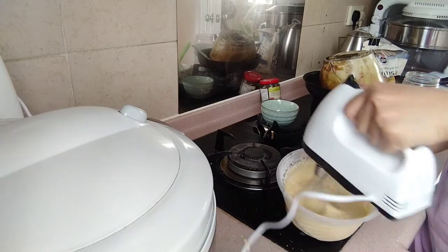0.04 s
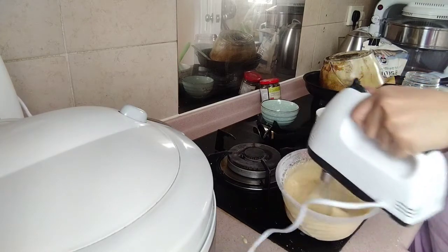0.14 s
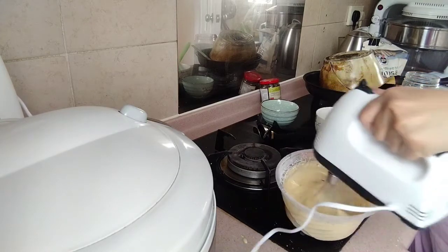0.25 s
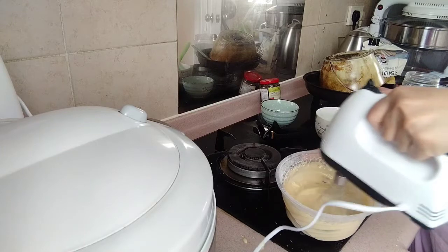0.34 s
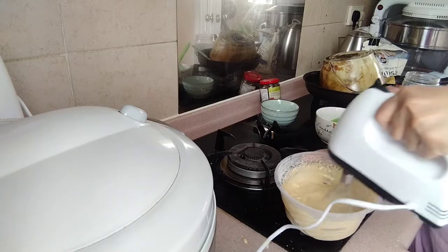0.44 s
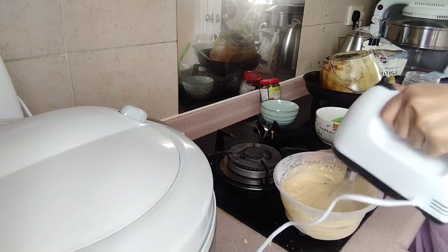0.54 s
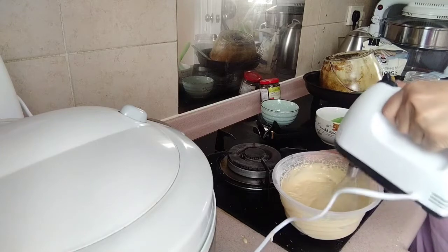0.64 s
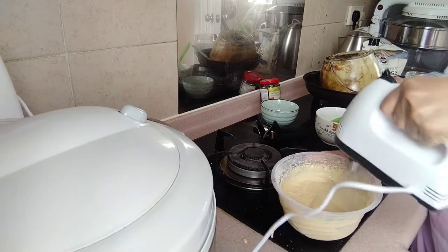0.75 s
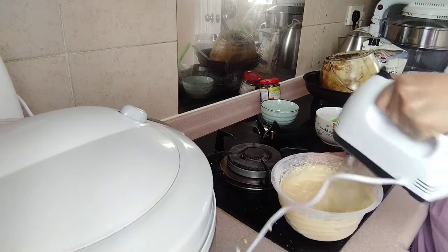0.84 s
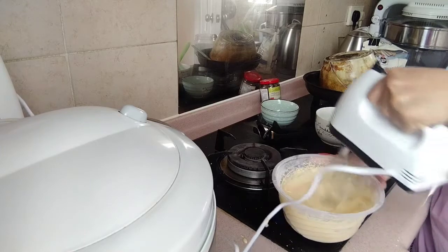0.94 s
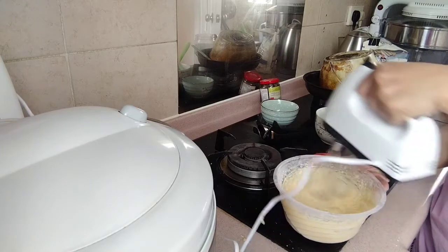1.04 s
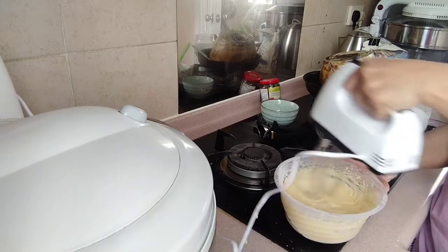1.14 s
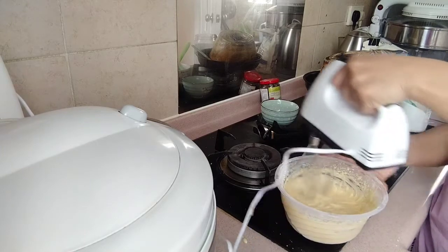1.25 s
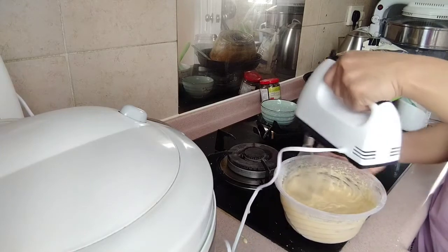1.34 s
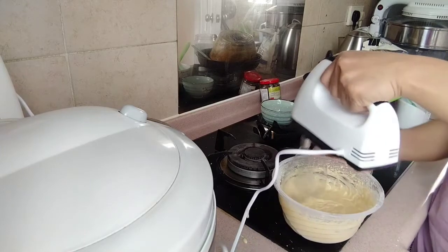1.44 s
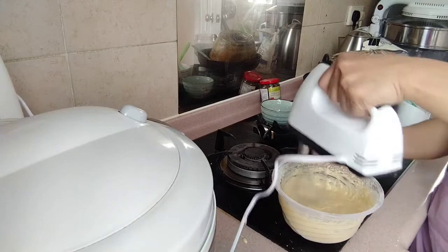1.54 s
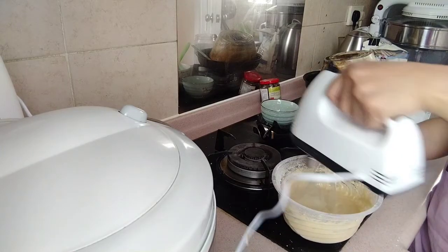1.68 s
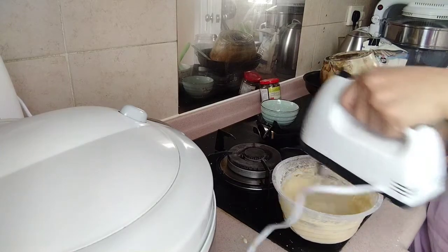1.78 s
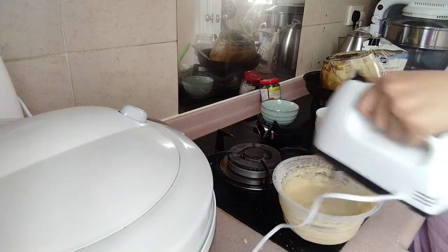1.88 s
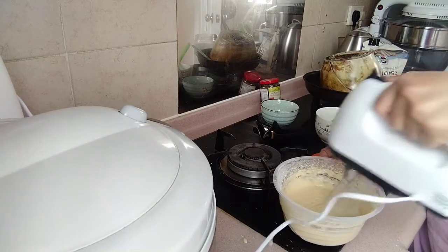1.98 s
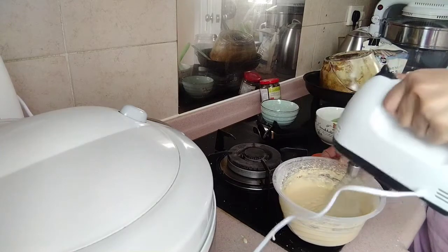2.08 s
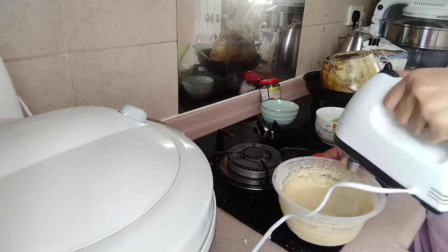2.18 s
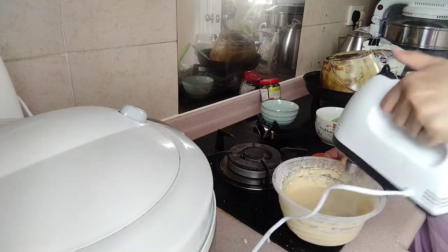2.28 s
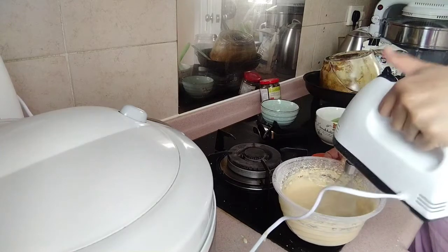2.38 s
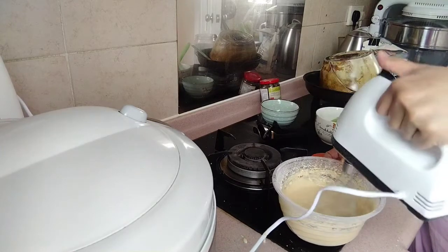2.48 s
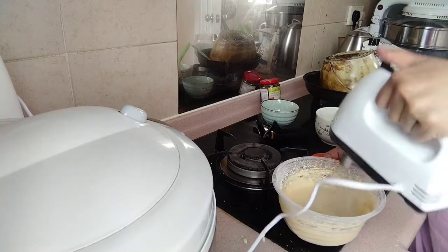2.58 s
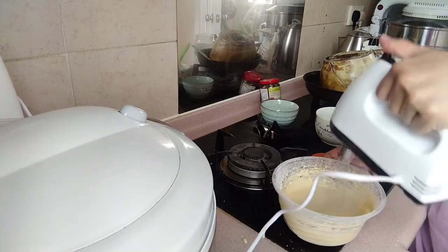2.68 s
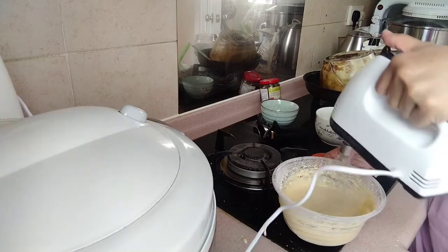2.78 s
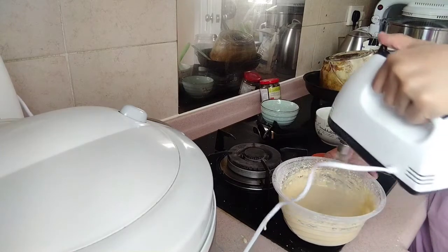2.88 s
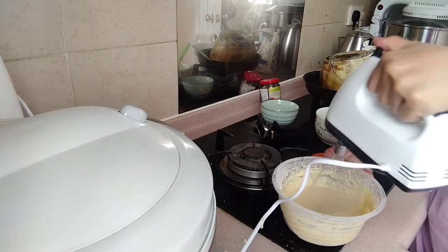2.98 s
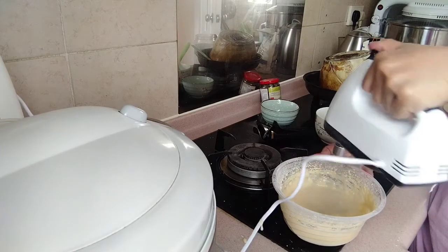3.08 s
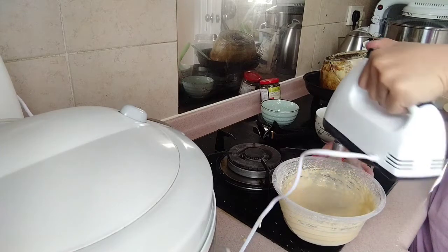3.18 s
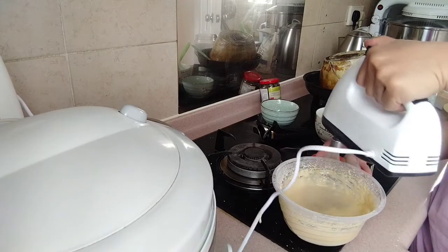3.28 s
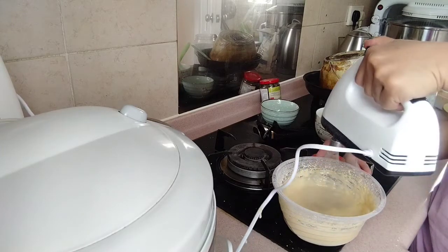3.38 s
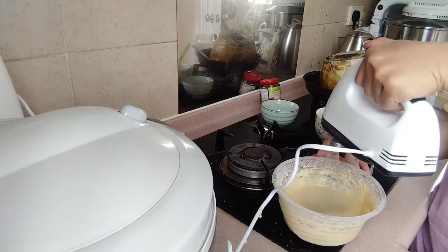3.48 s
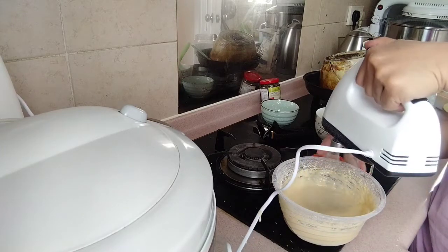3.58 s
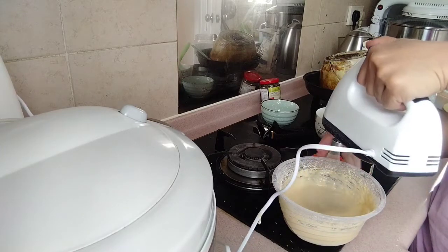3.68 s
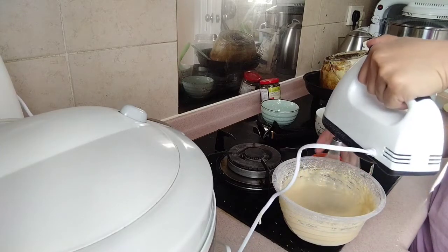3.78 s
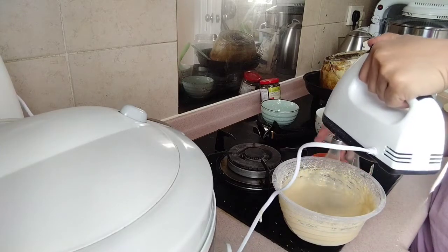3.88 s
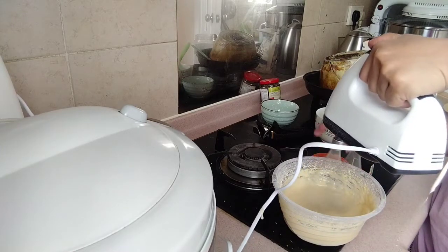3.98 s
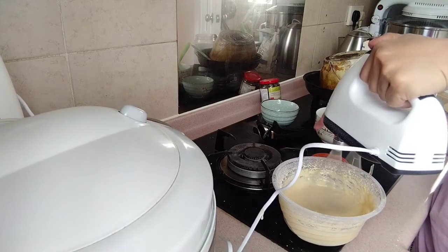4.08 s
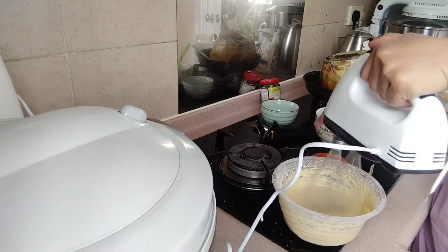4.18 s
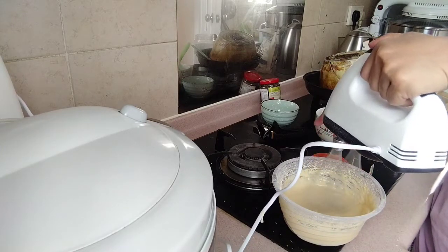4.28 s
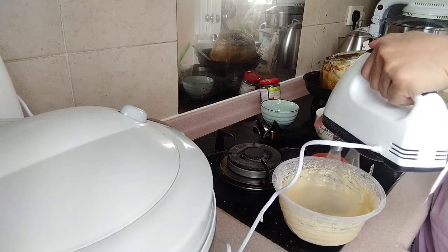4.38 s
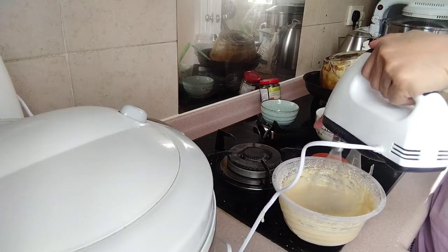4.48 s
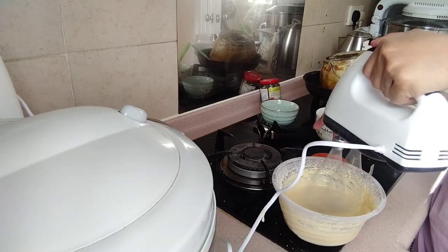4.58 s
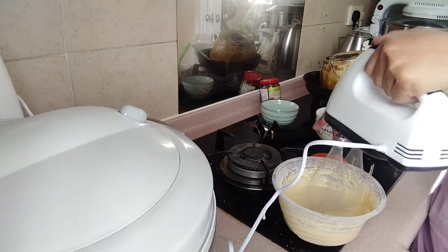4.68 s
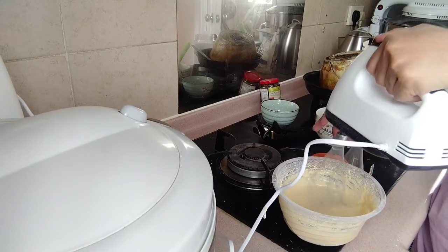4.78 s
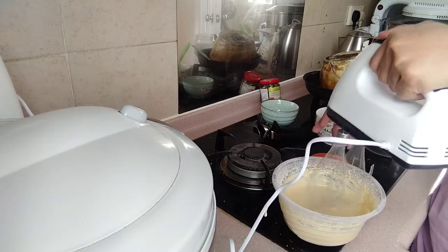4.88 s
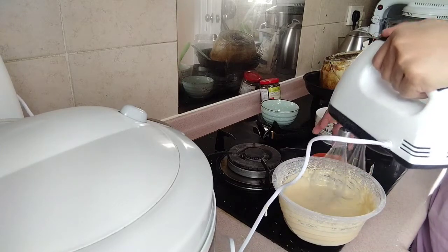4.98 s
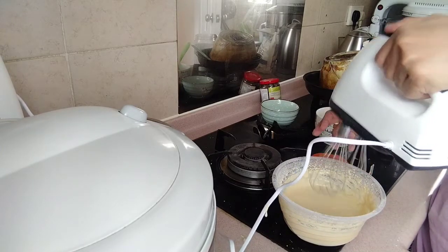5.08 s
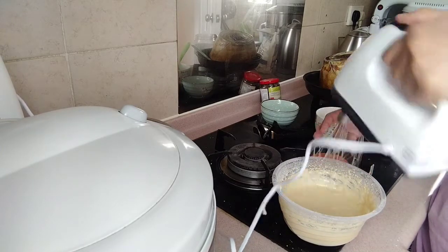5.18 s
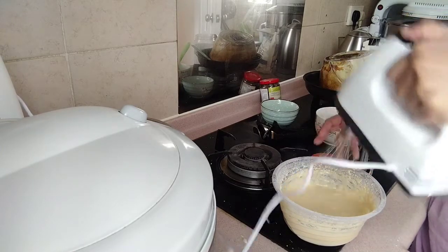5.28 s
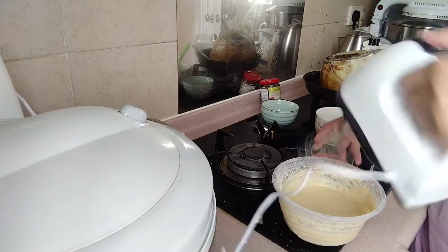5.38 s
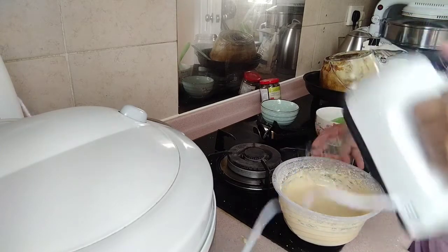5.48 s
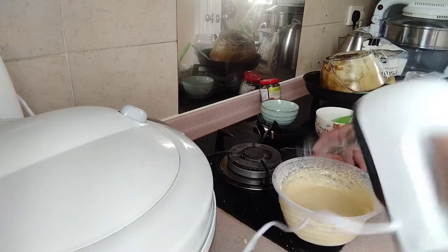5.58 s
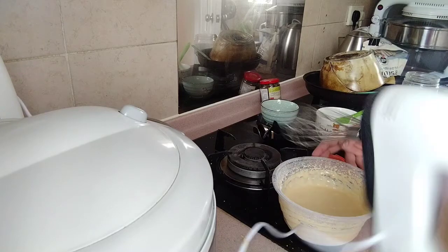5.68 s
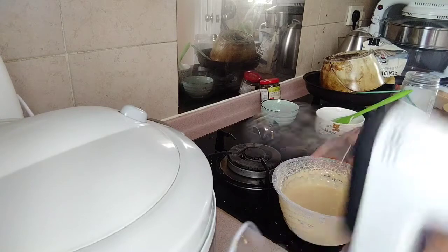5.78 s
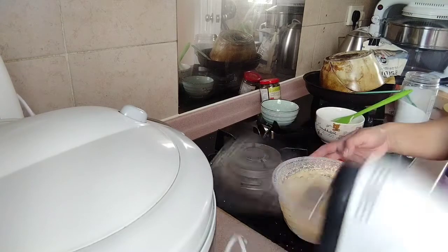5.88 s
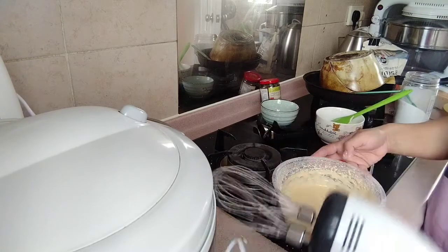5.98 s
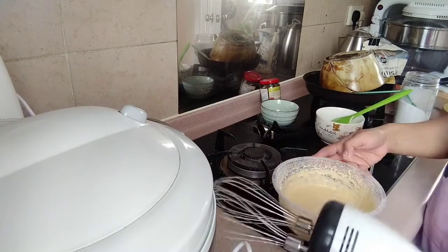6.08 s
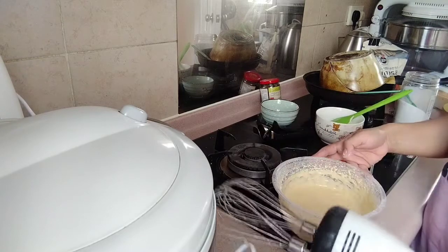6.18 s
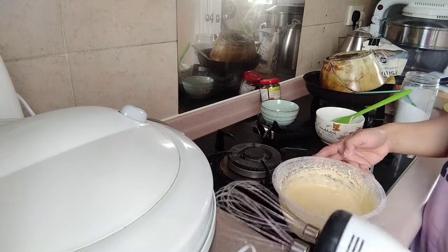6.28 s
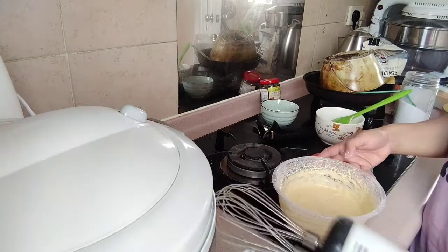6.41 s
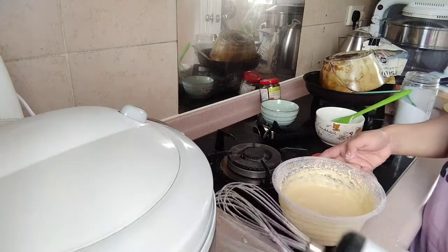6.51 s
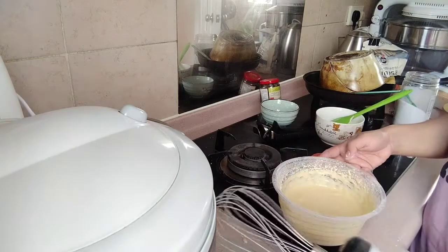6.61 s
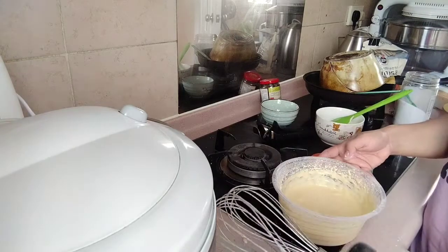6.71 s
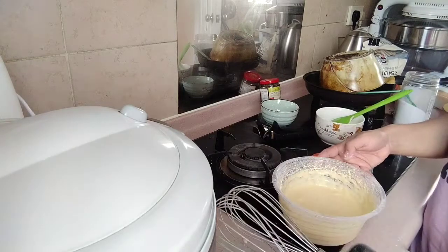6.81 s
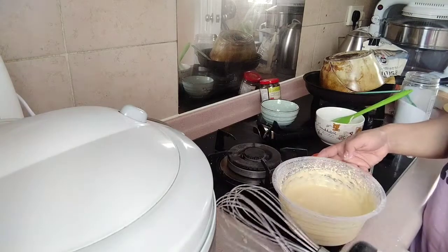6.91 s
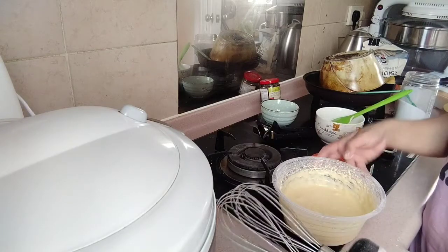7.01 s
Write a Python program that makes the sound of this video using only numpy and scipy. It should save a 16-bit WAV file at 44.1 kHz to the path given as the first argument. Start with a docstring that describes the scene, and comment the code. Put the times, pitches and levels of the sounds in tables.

```python
"""An electric hand mixer whisks batter in a plastic bowl in a small tiled kitchen with a low room murmur.
At first, on the slow setting, the rotor hums, the commutator whines, gears and wire beaters rattle and the
motor sags under load; the beaters dip, graze and strike the bowl while batter slaps and gulps. It speeds up to
the fast setting, is switched off and coasts to rest. Laid on the counter, it knocks, scrapes, clinks and twangs.
Shaft-driven tones, clicks and noise make the running motor; struck modes and noise bursts make the contacts."""
import sys
import numpy as np
from scipy import signal
from scipy.fft import rfft, irfft, next_fast_len
from scipy.io import wavfile
from scipy.ndimage import uniform_filter1d

SR = 44100
rng = np.random.default_rng(int(sys.argv[2]) if len(sys.argv) > 2 else 0)


def inscribe(sig):
    """Save sig as 16-bit PCM at rate SR to the path in sys.argv[1].

    A 1-D sig is mono; a 2-D sig holds one channel per row.
    Samples are clipped to [-1, 1] before scaling.
    """
    pcm = np.round(np.clip(np.atleast_2d(sig).T, -1, 1) * 32767)
    wavfile.write(sys.argv[1], SR, pcm.astype(np.int16))


N = 310905
T = np.arange(N) / SR
TOP_HZ = 15650
OFF_S, COAST_S, COAST_BEND = 4.42, .93, .22
FAST_FROM_S, FAST_RAMP_S = 2.3, 1
FULL_HZ, STALL_HZ = 310, 35  # shaft speed of the full noise level; speed below which noise dies away
BARS = 12  # commutator bars
GEAR_RATIO = 20  # shaft turns per beater turn


def mixer():
    """Motor, gears and beaters, all turned by one shaft."""
    hz, coast = shaft()
    turns = np.cumsum(hz * (1 + .002 * walk(90))) / SR
    beater_turns = turns / GEAR_RATIO
    flutter_db = flutter(beater_turns)
    graze_db, hiss_db = grazes()
    fast = np.clip((T - FAST_FROM_S) / FAST_RAMP_S, 0, 1)
    # torque throbs at twice the mains frequency on the slow setting
    throb = np.sin(2 * np.pi * 100 * T) * (1 - fast)
    whine = kitchen(motor_tones(hz, turns, fast, coast, throb), near_db=-16, far_db=-19)
    return (rotor_hum(hz, turns) + whine
            + brushes(hz, turns, throb, hiss_db + flutter_db)
            + gears(hz, turns, fast, flutter_db / 2)
            + beaters(hz, beater_turns, graze_db + flutter_db))


# Shaft speed under power, before the coast factor: time_s, speed_hz
MOTOR_SPEED = [(0.0, 248.0), (0.14, 248.2), (0.24, 244.8), (0.36, 236.6), (0.5, 231.2), (0.63, 233.3),
               (0.75, 242.9), (0.98, 255.3), (1.5, 270.5), (1.74, 282.8), (1.88, 281.1), (2.14, 275.6),
               (2.45, 295.3), (3.05, 309.9), (3.4, 312.8), (3.8, 314.1), (4.15, 309.1), (4.42, 304.4)]


def shaft():
    """Shaft speed in Hz and share of the coast gone by; friction brings the rotor to rest."""
    coast = np.clip((T - OFF_S) / COAST_S, 0, 1)
    return curves(MOTOR_SPEED)[0] * (1 - coast) * (1 - COAST_BEND * coast), coast


# Hum swelling as rotor speed meets a resonance: shaft_speed_hz, rms_level_db
HUM_RESPONSE = [(90, -83), (198, -67), (217, -38), (235, -35), (245, -41.5), (266, -49), (281, -41),
                (293, -35), (312, -35)]


def rotor_hum(hz, turns):
    """Sine at the shaft rate, its level set by the speed."""
    level_db = np.interp(hz, *np.transpose(HUM_RESPONSE))
    return np.sqrt(2) * np.sin(2 * np.pi * turns) * undb(level_db) * (hz > 0)


# Motor harmonics, levels before swells, fades and housing: shaft_multiple, slow_level_db, fast_level_db
TONES = [(2, -51.5, -45), (3, -56, -47), (5, -45, -46.5), (6, -54, -62), (9, -56, -53), (12, -47, -50),
         (13, -59, -64), (14, -64, -52.5), (16, -66, -55.5), (17, -66, -60), (19, -63, -63), (21, -65, -56),
         (22, -57, -59), (23, -54, -49.5), (24, -54, -52.5), (26, -58, -51.5), (28, -64, -59),
         (29, -62, -61), (30, -61, -54.5), (31, -58, -54), (32, -66, -59), (34, -62, -60), (35, -61, -63),
         (36, -50.5, -48.5), (48, -59, -51), (60, -69, -52.5), (72, -70, -54), (84, -75, -56)]
# Whine as the mixer is moved: middle_s, length_s, lowest_bar_tone_rise_db, tones_above_rise_db
WHINE_SWELLS = [(.15, .45, 4, 1), (.51, .36, 9.5, -5), (.9, .45, 3, 3), (1.24, .3, 6, 2),
                (1.43, .2, -1, -4), (1.63, .25, 8, 2), (2, .55, -10, -9), (2.45, .3, 5, 4),
                (2.72, .36, 7, 1), (4.82, .3, 11, 0)]
# Radiation of the motor tones by the housing: freq_hz, gain_db
HOUSING = [(480, -6), (515, 5), (545, -2), (564, 10), (590, 1), (620, 4), (660, 1), (700, 6), (760, 1),
           (1500, 0), (1750, 8), (1950, 3), (2600, 0), (3780, -1), (4700, -5), (5700, -1), (7300, 1),
           (8300, -3), (8900, 4), (9250, 3), (9550, -1), (10150, -1), (10580, 5), (10900, 2), (11120, -2),
           (11300, -11), (11900, -3), (13500, -7), (14400, -6), (15050, 0)]
BAR_THROB, TONE_THROB = 0.91, 0.23  # throb depth: lowest commutator tone, others
BAR_DROP_DB, TONE_DROP_DB, OFF_DROP_S = 4, 6, .06  # drop when the current stops: commutator, others
BAR_FADE_DB, TONE_FADE_DB = 52, 70  # further loss over the coast: commutator, others
SHAFT_PLAY_TURNS, WHINE_GRAIN_DB = .003, 2.5  # bearing play and bouncing brushes roughen the whine


def motor_tones(hz, turns, fast, coast, throb):
    """Harmonics of the shaft; those of the commutator bars glide on as the rotor coasts."""
    lowest_rise_db, upper_rise_db = swells(WHINE_SWELLS)
    off = np.clip((T - OFF_S) / OFF_DROP_S, 0, 1)
    bar_loss_db = BAR_DROP_DB * off + BAR_FADE_DB * coast ** 3
    tone_loss_db = TONE_DROP_DB * off + TONE_FADE_DB * coast ** 2
    turns = turns + SHAFT_PLAY_TURNS * walk(300)
    grain = undb(WHINE_GRAIN_DB * (walk(60) + walk(250)) / np.sqrt(2))
    whine = 0
    for k, slow_db, fast_db in TONES:
        level_db = slow_db + fast * (fast_db - slow_db)
        level_db = level_db + 2.2 * walk(14)  # each tone wavers on its own
        level_db = level_db - (tone_loss_db if k % BARS else bar_loss_db)
        level_db = level_db + (k == BARS) * lowest_rise_db + (k > BARS) * upper_rise_db
        depth = BAR_THROB if k == BARS else TONE_THROB
        tone = np.sin(2 * np.pi * (k * turns + rng.random())) * (k * hz < TOP_HZ)
        whine = whine + undb(level_db) * (1 + depth * throb) * tone
    return colour(whine * unit(grain) * (hz > 0), HOUSING)


# Spectral outline of the brush hiss: freq_hz, gain_db
BRUSH_COLOUR = [(2000, -17), (4000, 5), (5500, 3.5), (6500, -2), (7700, 7.5), (9500, 3.5), (11500, 0),
                (13500, -8), (15200, 10), (16000, -16.5)]
BRUSH_DB, BRUSH_DOUBLING_DB = -43.5, 8  # level at FULL_HZ; rise per speed doubling


def brushes(hz, turns, throb, rise_db):
    """Unevenly worn commutator bars tick under the sparking, hissing brushes."""
    bars = clicks(BARS * turns, rng.standard_normal(BARS), scatter_db=3)
    sparks = unit(grains(520, spread_db=1.5))
    hiss = .5 * unit(bars) + rng.standard_normal(N) + 0.7 * sparks
    hiss = hiss * (1 + 0.11 * throb)
    level_db = driven(hz, BRUSH_DB, BRUSH_DOUBLING_DB) + rise_db
    return unit(kitchen(colour(hiss, BRUSH_COLOUR))) * undb(level_db)


# Gears juddering in their play: middle_s, length_s, rise_db
JUDDERS = [(1, 0.48, 3), (2.29, 0.31, 4.5), (2.79, .09, 4.5), (2.91, 0.056, 4.5), (3.04, .08, 3.5),
           (3.23, .09, 3), (4.01, 0.2, 2.5), (4.615, .06, 5), (4.69, 0.077, 4), (4.96, 0.13, 4.5)]
# Gearbox resonances rung by judders: freq_hz, width_hz, gain_db
JUDDER_PEAKS = [(710, 90, -8.5), (920, 110, -5.5)]
# Fixed resonances heard on the fast setting with the mixer held still: freq_hz, width_hz, gain_db
STILL_PEAKS = [(614, 16, 7), (695, 34, -1), (924, 22, 1), (1052, 26, 2), (1157, 24, 3), (1232, 36, -2),
               (2970, 140, -1)]
# Resonances of casing and bowl, also for beaters and strikes: freq_hz, width_hz, gain_db
CASING = [(220, 8.2, 12), (736, 210, 4), (920, 11, -7), (1265, 280, -4.5), (1590, 37, -6), (2063, 240, -3)]
# Spectral outline of the gears: freq_hz, gain_db
GEAR_COLOUR = [(300, -36), (540, -10), (690, 0), (820, -2.5), (1250, -2.5), (1600, -11), (2600, -15)]
GEAR_DB, GEAR_DOUBLING_DB = -34, 9  # level at FULL_HZ; rise per speed doubling
JUDDER_FULL_DB = 5  # judder that rings its peaks fully


def gears(hz, turns, fast, rise_db):
    """The worm gear chatters in its play, coloured by fixed resonances and the casing."""
    judder_db = swells(JUDDERS)[0]
    teeth = unit(clicks(turns + .1 * walk(200), [1], scatter_db=1.0))
    load_db = 1.8 * np.tanh(walk(35))  # batter drags unevenly on the beaters
    rattle = (0.55 * teeth + unit(grains(1800, spread_db=3.5))) * undb(load_db)
    rattle = rattle + fast * (resonate(rattle, STILL_PEAKS) - rattle)
    rattle = rattle + judder_db / JUDDER_FULL_DB * (resonate(rattle, JUDDER_PEAKS) - rattle)
    level_db = driven(hz, GEAR_DB, GEAR_DOUBLING_DB) + judder_db + rise_db
    return unit(kitchen(colour(resonate(rattle, CASING), GEAR_COLOUR))) * undb(level_db)


# Beaters dipping into the batter, also for batter(): middle_s, length_s, gulp_rise_db, slap_rise_db, clatter_rise_db
DIPS = [(.32, 0.28, 21, 2, 3), (.62, 0.42, 19, -4.5, 1), (1.2, 0.9, 10.5, 0, -1),
        (1.95, 0.76, 12.5, 5.5, 3), (2.22, 0.5, 18.5, 4, 4), (2.9, 0.56, 8, 2, 1),
        (3.5, 0.49, 6, -0.5, 0.5), (4.14, .25, 9, 2.5, 1)]
# Spectral outline of the beaters: freq_hz, gain_db
BEATER_COLOUR = [(500, -26), (1000, 2), (1500, 3.5), (1800, 4), (2130, 1), (2500, 1), (2900, 3.5),
                 (3300, 0), (4500, -7.5), (6300, -9.5), (8000, -3), (12000, -24.5), (15500, -30)]
BEATER_DB, BEATER_DOUBLING_DB = -35, 7.5  # level at FULL_HZ; rise per speed doubling


def beaters(hz, beater_turns, rise_db):
    """Wires slap past in turn on slower shafts and clatter at random."""
    wires = unit(clicks(10 * beater_turns + 0.2 * walk(100), [1, -1], scatter_db=3.5))
    clatter = wires + 1.02 * unit(grains(1500, spread_db=2.0))
    dip_db = swells(DIPS)[2]
    level_db = driven(hz, BEATER_DB, BEATER_DOUBLING_DB) + dip_db + rise_db
    return unit(kitchen(colour(resonate(clatter, CASING), BEATER_COLOUR))) * undb(level_db)


# Wires grazing the bowl wall: middle_s, length_s, clatter_rise_db, hiss_rise_db
GRAZES = [(.32, 0.12, 2.5, 2.5), (.53, 0.18, 2.5, 3.5), (.95, 0.3, 2, 4.5), (1.65, 0.033, 8.5, -4),
          (1.735, 0.07, 6.5, 8), (2.23, 0.44, 0.5, 6.5)]


def grazes():
    """Level changes in dB of beater clatter and hiss as wires touch the wall."""
    return swells(GRAZES)


# Wobble at 1, 2, 3, 4 cycles per beater turn: depth_db
FLUTTER_DB = [1.1, .6, .7, .7]


def flutter(beater_turns):
    """Level in dB of a wobble that repeats with every turn of the slightly bent beaters."""
    return sum(db * np.sin(2 * np.pi * (k * beater_turns + rng.random())) for k, db in enumerate(FLUTTER_DB, 1))


def driven(hz, full_db, doubling_db):
    """Level in dB of a noise that grows with the shaft speed and vanishes at a standstill."""
    hz = np.maximum(hz, 1)
    return full_db + doubling_db * np.log2(hz / FULL_HZ) - 10 * np.log10(1 + (STALL_HZ / hz) ** 2)


# Spectral outline of the slaps: freq_hz, gain_db
BATTER_COLOUR = [(90, -33), (200, -5.5), (260, -3), (350, 0.5), (430, 0), (520, -6), (800, -23.5)]
# Spectral outline of the gulps: freq_hz, gain_db
GULP_COLOUR = [(25, -34), (45, -15.5), (65, 11.5), (82, -24), (115, 10), (160, -7.5), (260, -30.5)]
SLAP_DB, SLAP_DOUBLING_DB = -43, 6  # level at FULL_HZ; rise per speed doubling
GULP_DB, GULP_DOUBLING_DB = -65.5, 10.5  # as above
LIFTED_AT = 0.79  # share of the coast after which the beaters are clear of the batter


def batter():
    """Soft irregular slaps of churned batter, and low gulps where the beaters dig in."""
    hz, coast = shaft()
    dip_gulp_db, dip_slap_db, _ = swells(DIPS)
    immersed = 1 - np.minimum(coast / LIFTED_AT, 1) ** 2
    slap_db = driven(hz, SLAP_DB, SLAP_DOUBLING_DB) + dip_slap_db
    gulp_db = driven(hz, GULP_DB, GULP_DOUBLING_DB) + dip_gulp_db
    slaps = (unit(grains(250, spread_db=1.5)) + .5 * rng.standard_normal(N)) * undb(2 * walk(11))
    slaps = colour(resonate(slaps, [(235.2, 7, 14.0)]), BATTER_COLOUR)
    slaps = unit(kitchen(slaps)) * undb(slap_db)
    gulps = unit(colour(grains(200, spread_db=6.0), GULP_COLOUR)) * undb(gulp_db)
    return (slaps + gulps) * immersed


# Beaters striking the bowl, impulse level before filters and gain: start_s, level_db
STRIKES = [(0.9506, -14.5), (0.9746, -23), (1.3747, -14.5), (1.4443, -16), (1.713, -22), (2.1305, -19.5),
           (2.1518, -14), (2.2627, -26), (2.281, -15.5), (2.2981, -12), (2.304, -23), (3.0026, -24)]


def strikes():
    """Impulses ring casing and bowl where a beater catches the wall."""
    hits = np.zeros(N)
    for start_s, level_db in STRIKES:
        hits[int(start_s * SR)] += undb(level_db)
    outline = [(300, -7.0), (900, 10.0), (2500, 8.5), (5000, 4.5), (8000, 10.0), (11000, -1.5), (15000, -18.5)]
    ticks = colour(resonate(hits, CASING), outline)
    return undb(3.0) * kitchen(ticks)


# Last jolt of the gears, then knocks and rebounds as the mixer is laid down; range levels before the final colour:
# start_s, thump_db, body_db, clack_db, tick_db, rise_s, contact_s, casing_ring_db, whisk_ring_db
KNOCKS = [(5.149, -80, -47.5, -49, -66, 0.0005, 0.036, -2, -13),
          (5.6, -82, -40.5, -44.5, -52.5, 0.0013, 0.14, -5, -16),
          (5.609, -85, -38, -50, -60, 0.00044, 0.031, -8, -15),
          (5.743, -90, -44, -49.5, -66, 0.0023, 0.064, -7, -16),
          (5.872, -90, -78, -75, -67, .0003, .01, -20, -14),
          (5.887, -84, -60, -52.5, -75, 0.0014, 0.03, -14, -17),
          (5.973, -65, -51, -51.5, -66, 0.00078, 0.033, -1, -8),
          (6, -51, -44.5, -41.5, -54, 0.00026, 0.053, -10, -22),
          (6.087, -46.5, -37, -40, -56.5, 0.0019, 0.09, 1.5, -26),
          (6.114, -51, -40, -51, -62, 0.00055, 0.017, -9, -26),
          (6.364, -51.5, -48, -57, -79, 0.0017, .03, -22, -1),
          (6.389, -50, -59, -54, -69, 0.0016, 0.034, -11, -5),
          (6.441, -70, -60, -62, -80, 0.0011, 0.013, -15, -12),
          (6.675, -85, -71, -66, -59, .0003, .012, -14, -1),
          (6.683, -78, -47, -51, -77, 0.0033, 0.046, -4, -10.5),
          (6.816, -75, -62, -52.5, -58, 0.00069, 0.013, -28, 4),
          (6.837, -72, -71, -46.5, -56, 0.000058, 0.011, -10, -10),
          (6.84, -85, -70, -51, -52, 0.000089, 0.011, -16, -20)]
# Casing modes, before scatter: freq_hz, level_db, t60_s
CASING_MODES = [(236.7, 15, 0.49), (657, 1.5, 0.26), (771, 4.5, 0.22), (828, 0.5, 0.16), (1146, 1, 0.17),
                (1420, 2, 0.046), (1560, 4, 0.076), (1730, 1.5, 0.17), (1917, 18.5, 0.062), (2180, 7, 0.19),
                (2580, 7, 0.091), (2940, 8, 0.069), (5030, 7, 0.076)]
# Whisk modes, before scatter: freq_hz, level_db, t60_s
WHISK_MODES = [(242, -10, 0.48), (917, -1, 0.3), (1265, 12, 0.13), (1330, 5.5, 0.29), (1965, -0.5, 0.22),
               (2260, 11, 0.11), (2340, 3, 0.26), (2940, 2, 0.23), (4500, -16, 0.2)]


def knocks():
    """Each contact is a brief clatter that rings casing and whisk; its hardness sets the weight of four ranges."""
    out = np.zeros(N + SR)
    ranges_hz = [(150, 400), (550, 1450), (1450, 4200), (4200, 15000)]
    for start_s, *range_db, rise_s, contact_s, casing_db, whisk_db in KNOCKS:
        crack = chatter(contact_s)
        size = len(crack)
        # duller echo from the tiles
        crack = crack + .5 * colour(burst(0.35), [(3000, 1.0), (9000, -2.5)])
        casing = undb(casing_db) * ring(CASING_MODES, size)
        whisk = undb(whisk_db) * ring(WHISK_MODES, size)
        blow = crack + casing + whisk
        blow = blow * (1 - np.exp(-T[:size] / rise_s))  # a rolling contact builds up slowly
        at = int(start_s * SR)
        for edges_hz, level_db in zip(ranges_hz, range_db):
            band = signal.butter(4, edges_hz, "band", fs=SR, output="sos")
            part = signal.sosfilt(band, blow)
            out[at:at + size] += undb(level_db) * part / np.std(part[:1100])
    outline = [(450, -7.0), (800, -7.5), (2500, -2.5), (5000, -5.0), (8000, 0.5), (14000, -30)]
    return colour(out[:N], outline)


CHATTER_PER_S, CHATTER_DECAY_S = 260, .0011  # tiny hits of loose parts within a knock


def chatter(contact_s):
    """A contact broken into tiny uneven hits, the first at once; energy 1."""
    crack = burst(contact_s)
    hits = (rng.random(len(crack)) < CHATTER_PER_S / SR) * rng.random(len(crack))
    hits[0] = 1
    decay = np.exp(-1 / (CHATTER_DECAY_S * SR))
    crack = crack * (.2 + signal.lfilter([1], [1, -decay], hits))
    return crack / np.linalg.norm(crack)


GRIP_DETUNE, SPOT_SCATTER_DB = .009, 3  # grip and contact point shift and weight the modes at each blow


def ring(modes, size):
    """Decaying modes struck at a random spot, of energy 1."""
    t = T[:size]
    x = np.zeros(size)
    for freq_hz, level_db, t60_s in modes:
        envelope = undb(level_db + SPOT_SCATTER_DB * rng.standard_normal() - 60 * t / t60_s)
        shifted_hz = freq_hz * (1 + GRIP_DETUNE * rng.standard_normal())
        x += envelope * np.sin(2 * np.pi * shifted_hz * t)
    return x / np.linalg.norm(x)


# Beater wires sliding on the counter: start_s, level_db, t60_s
SLIDES = [(5.86, -72, 0.41), (5.92, -68, 0.99), (6.252, -68, 0.11), (6.55, -69, 0.96), (6.64, -64.5, 0.49)]
# Dry swishes of the casing along the counter: start_s, level_db, t60_s
SWISHES = [(6.56, -74, 0.75), (6.66, -72, 0.44), (6.838, -49, 0.14)]
# Resonances of the sliding wires: freq_hz, width_hz, gain_db
WIRES = [(3050, 85, 10), (3640, 90, 0.5), (4500, 120, -1), (6260, 150, -1), (7950, 220, 0)]
SLIDE_ATTACK_S, SWISH_ATTACK_S = 0.0096, 0.0028


def slide():
    """Thin scraping of the beater wires as they settle, ending in a dry swish along the counter."""
    scrape = resonate(rng.standard_normal(N) + unit(grains(610, spread_db=-6.0)), WIRES)
    scrape = unit(colour(scrape, [(800, -12), (2500, 10.0), (8000, 3.0), (14000, -9.0)]))
    swish = unit(colour(rng.standard_normal(N), [(3000, -23.5), (9000, 6), (15000, -1.0)]))
    return scrape * strokes(SLIDES, SLIDE_ATTACK_S) + swish * strokes(SWISHES, SWISH_ATTACK_S)


# Wires touching down, rms over the first 25 ms: start_s, level_db
TWANGS = [(6.258, -70.5), (6.389, -65)]
# Modes of a wire, before scatter: freq_hz, level_db, t60_s
WIRE_MODES = [(3100, 5, 1), (3500, 4, 0.24), (4530, -5, 0.5), (5250, -8, .4), (5986, -11, .45),
              (6417, -10, 0.44), (7100, -10, 0.46), (7800, -3, 0.63)]


def twangs():
    """The thin wires of the beaters ring on after touching the counter."""
    out, size = np.zeros(N + SR), SR // 2
    for start_s, level_db in TWANGS:
        wire = sum(ring(WIRE_MODES, size) for _ in range(3))  # nearly alike wires beat against each other
        at = int(start_s * SR)
        out[at:at + size] += undb(level_db) * wire / np.std(wire[:1100])
    return out[:N]


# Spectral outline of the quiet kitchen: freq_hz, gain_db
ROOM_COLOUR = [(25, -44), (45, -35), (65, 2.5), (90, -6.5), (125, -3), (170, -26), (240, -9), (320, -25),
               (1000, -24), (3000, -36), (8000, -47.5), (15000, -53.5)]
ROOM_DB = -67  # before its slow swell


def room_tone():
    """The low murmur of the quiet kitchen, strongest at its deepest resonance."""
    swell_db = 2.5 * walk(6)
    murmur = resonate(rng.standard_normal(N), [(67, 14, 1.6)])
    return unit(colour(murmur, ROOM_COLOUR)) * undb(ROOM_DB + swell_db)


SWAY_HZ = .35  # rate at which the hand carries the mixer through the reflections


def kitchen(x, near_db=-3, near_t60=0.025, far_db=-6, far_t60=0.24):
    """Direct sound, quick reflections from counter and tiles that shift as the mixer sways, and a duller tail."""
    def echoes():
        near = undb(near_db) * burst(near_t60)
        far = undb(far_db) * colour(burst(far_t60), [(2500, 12.0), (7000, 6.0), (15000, -7.0)])
        return np.r_[np.zeros(61), near + far]
    here, there = echoes(), echoes()
    sway = 2 * np.pi * SWAY_HZ * T
    wet_here = np.cos(sway) * signal.oaconvolve(x, here)[:N]
    wet_there = np.sin(sway) * signal.oaconvolve(x, there)[:N]
    return (x + wet_here + wet_there) / np.sqrt(1 + (here @ here + there @ there) / 2)


def undb(db):
    """Decibels to gain."""
    return 10 ** (np.asarray(db) / 20)


def unit(x):
    """Scale to rms 1."""
    return x / np.sqrt(np.mean(x ** 2) + 1e-20)


def curves(table):
    """Each column of a table as a value per sample."""
    time_s, *columns = np.transpose(table)
    return [np.interp(T, time_s, c) for c in columns]


def walk(rate_hz):
    """Smoothed random curve of rms 1."""
    points = np.interp(T * rate_hz, np.arange(4096), rng.standard_normal(4096))
    return unit(uniform_filter1d(points, int(SR / rate_hz)))


def swells(table):
    """Smooth humps from rows of (middle_s, length_s, heights): one sum per column of heights."""
    rows = np.array(table)
    humps = np.cos(np.pi * np.clip((T - rows[:, :1]) / rows[:, 1:2], -.5, .5)) ** 2
    return rows[:, 2:].T @ humps


def strokes(table, attack_s):
    """Gain of strokes that rise quickly and die away, from rows of (start_s, level_db, t60_s)."""
    gain = np.zeros(N)
    for start_s, level_db, t60_s in table:
        attack = np.clip((T - start_s) / attack_s, 0, 1)
        decay_db = 60 * np.maximum(T - start_s - attack_s, 0) / t60_s
        gain += attack * undb(level_db - decay_db)
    return gain


def colour(x, points):
    """Causal minimum-phase filter with the given (freq_hz, gain_db) outline."""
    size = next_fast_len(len(x) + 8192, real=True)
    size += size % 2
    hz, db = np.transpose(points)
    bins_hz = np.arange(size // 2 + 1) * SR / size
    gain = undb(np.interp(np.log(bins_hz + 1), np.log(hz), db))
    cepstrum = irfft(np.log(gain))
    cepstrum[1:size // 2] *= 2
    cepstrum[size // 2 + 1:] = 0
    return irfft(rfft(x, size) * np.exp(rfft(cepstrum)))[:len(x)]


def resonate(x, peaks):
    """The sound plus what it rings up in (freq_hz, width_hz, gain_db) resonances."""
    return x + sum(undb(db) * signal.lfilter(*signal.iirpeak(hz, hz / width, fs=SR), x) for hz, width, db in peaks)


def burst(t60_s, size=22050):
    """Noise that dies away, of energy 1."""
    x = rng.standard_normal(size) * np.exp(-np.log(1000) * T[:size] / max(t60_s, .002))
    return x / np.linalg.norm(x)


def clicks(cycles, pattern, scatter_db):
    """A click at each whole cycle, sized by a repeating pattern and by chance."""
    at = np.flatnonzero(np.diff(np.floor(cycles)) > 0)
    # split between two samples for exact timing
    share = (np.ceil(cycles[at]) - cycles[at]) / (cycles[at + 1] - cycles[at])
    chance = np.clip(rng.standard_normal(N)[:len(at)], -2, 2)
    size = np.resize(pattern, len(at)) * undb(scatter_db * chance)
    return np.bincount(at, size * (1 - share), N) + np.bincount(at + 1, size * share, N)


def grains(rate_hz, spread_db):
    """Random tiny impacts of either sign, with exponentially spread levels."""
    level_db = spread_db * np.minimum(rng.exponential(size=N), 3.6)
    return (rng.random(N) < rate_hz / SR) * rng.choice([-1, 1], N) * undb(level_db)


def scene():
    """Sum of all sources, one channel."""
    return (mixer() + batter() + strikes() + knocks() + slide() + twangs() + room_tone())[None]


def record(dry):
    """Steep low-pass at TOP_HZ."""
    return signal.sosfilt(signal.ellip(12, .2, 80, TOP_HZ, fs=SR, output="sos"), dry)


dry = scene()
out = record(dry)
inscribe(out)
```